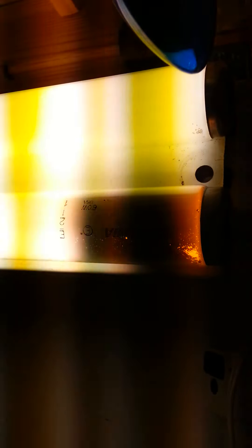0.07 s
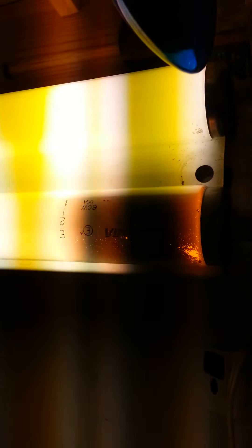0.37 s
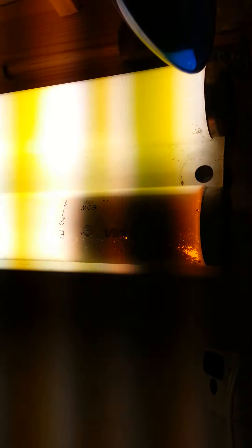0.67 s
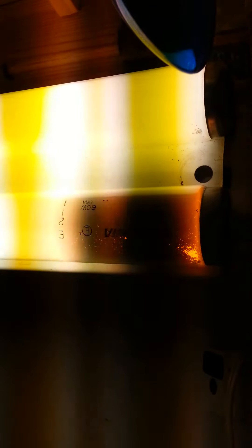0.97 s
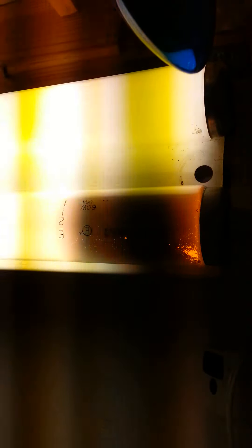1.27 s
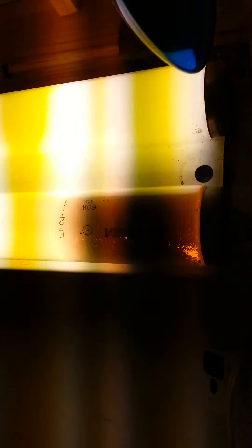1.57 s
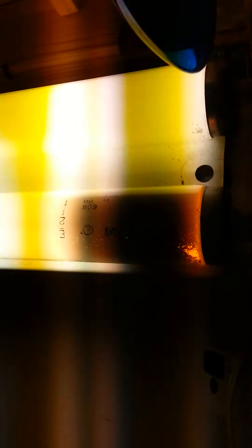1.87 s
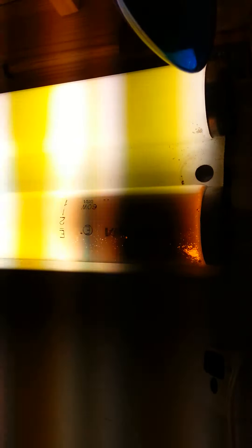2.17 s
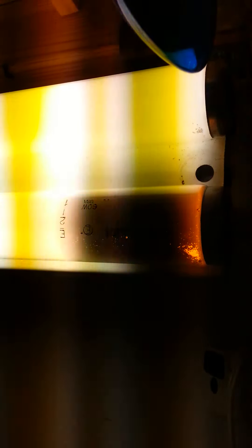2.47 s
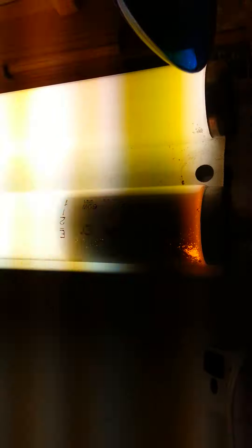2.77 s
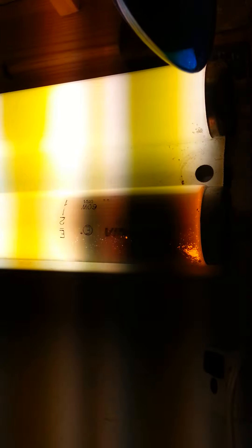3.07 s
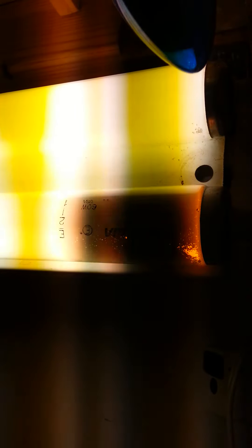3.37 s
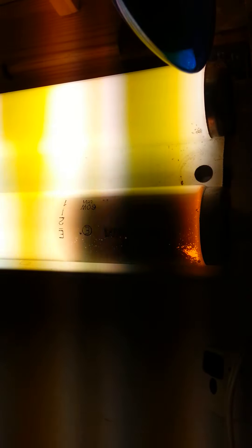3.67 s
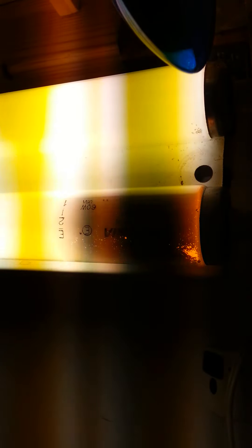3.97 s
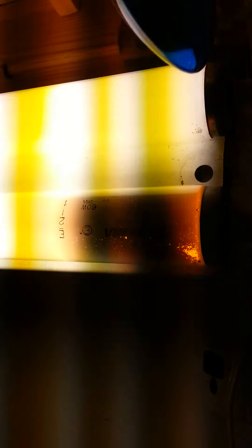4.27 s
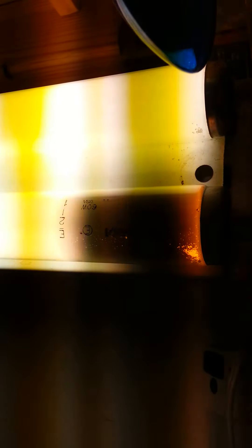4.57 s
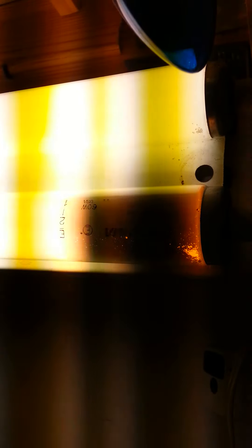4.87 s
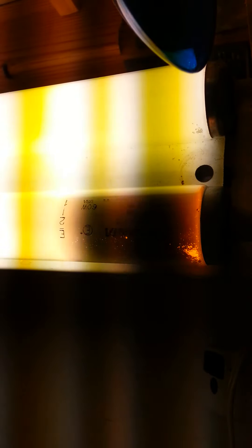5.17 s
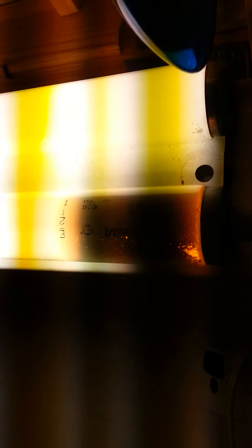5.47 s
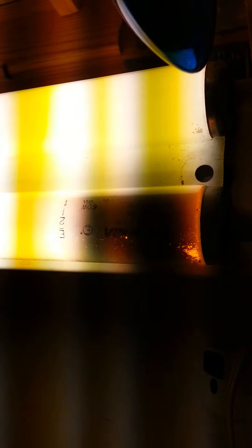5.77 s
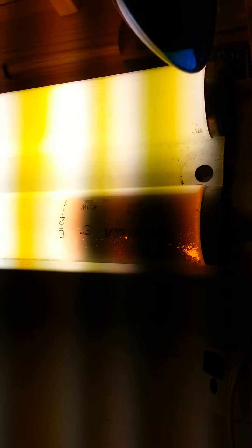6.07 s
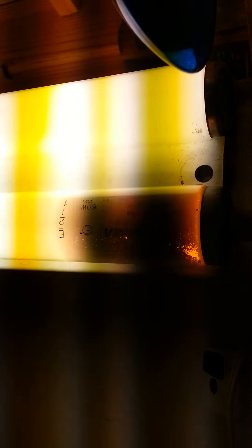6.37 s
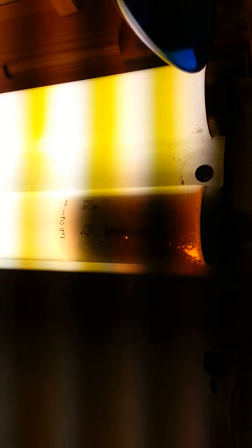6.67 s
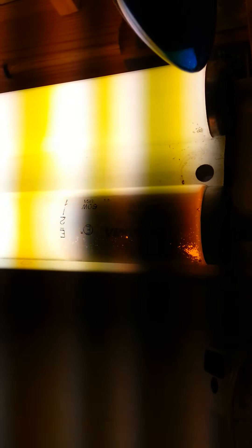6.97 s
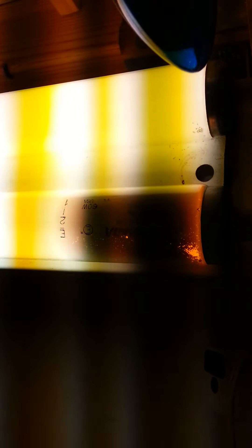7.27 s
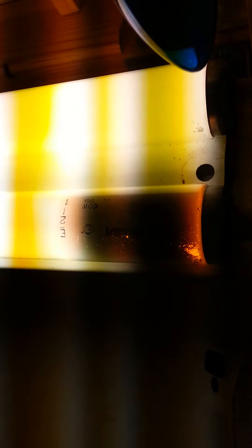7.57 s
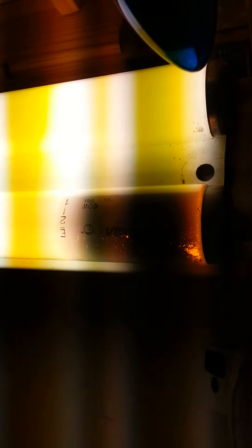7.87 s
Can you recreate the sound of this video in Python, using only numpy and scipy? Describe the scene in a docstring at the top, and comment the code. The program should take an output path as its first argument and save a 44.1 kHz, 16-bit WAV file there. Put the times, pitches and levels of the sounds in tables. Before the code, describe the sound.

Close electrical buzz from a flickering fluorescent light, sputtering and crackling over a low hum before settling somewhat.

```python
"""A failing fluorescent tube in a small room, with a stereo microphone very close to the fixture.
Its ballast knocks twice in each mains cycle: an even hum while the arc holds, a stumbling rattle while
it flickers. The worn electrode fizzes, crackles in bursts and now and then snaps against the glass;
after about five seconds the arc calms down. A fine sizzle and a thin whistle sit to the right,
and behind it all lies the room tone, a faint hiss and a low drone."""
import sys
import numpy as np
from scipy import signal
from scipy.fft import rfft, irfft, next_fast_len
from scipy.io import wavfile

SR = 44100
rng = np.random.default_rng(int(sys.argv[2]) if len(sys.argv) > 2 else 0)


def file_out(sig):
    """Save sig as 16-bit WAV at sys.argv[1]."""
    # one column per channel
    cols = np.atleast_2d(sig).T
    # limit, then scale
    lim = np.clip(cols, -1, 1)
    pcm = np.round(lim * 32767).astype(np.int16)
    wavfile.write(sys.argv[1], SR, pcm)


N = 353241
TIME = np.arange(N) / SR
SIZE = next_fast_len(N + SR)
FREQ = np.maximum(np.arange(SIZE // 2 + 1) * SR / SIZE, 1)
MAINS_HZ = 60.01

# spectrum of the background hiss: (frequency [Hz], relative level [dB])
HISS_SPECTRUM = [(20, 2), (40, 6), (56, 17), (70, 16), (100, 21), (300, 27.5), (700, 18), (1500, 5),
                 (3300, 0), (4100, -3), (4750, 9), (5600, -5.5), (9000, -2.5), (14500, -5.5)]
# swells of the arc's whistle at the right microphone: (peak time [s], length [s], level [dB])
WHISTLE_SWELLS = [(.15, 1.1, -66), (1.004, 0.3, -59), (6.1, 1.3, -72)]
# the arc's sizzle at the right microphone: (time [s], level [dB])
SIZZLE_LEVELS = [(0, -61), (1.45, -61), (1.55, -69), (1.8, -61), (4.35, -58), (4.5, -63), (5.5, -71),
                 (5.65, -69), (6.7, -67), (6.9, -80), (7.5, -72), (7.8, -61), (8, -54)]
# highest modes of the tube: (frequency [Hz], width [Hz], relative level [dB])
TUBE_MODES = [(7075, 35, 1), (8340, 200, 0), (9070, 120, -3), (9890, 90, 2), (10080, 50, -1),
              (11600, 200, -8), (12300, 500, -5), (14000, 700, -10)]

# spectrum of the fizz: (frequency [Hz], relative level [dB])
FIZZ_SPECTRUM = [(300, -20), (700, -4), (1100, 0), (1450, -1), (2300, 0), (3300, -2), (4500, -1),
                 (6000, -3), (8000, -8), (10500, -13), (12800, -10.5), (14500, -16)]
# spectrum of the crackle: (frequency [Hz], relative level [dB])
CRACKLE_SPECTRUM = [(1000, -7), (3500, -7.5), (5000, -0.5), (6800, -0.5), (8500, -4), (9600, -9),
                    (12500, -20.5), (14500, -36)]
# modes of the end cap: (frequency [Hz], width [Hz], level against the fizz spectrum [dB])
CAP_MODES = [(1882, 46, 10.5), (1968, 30, 8), (2014, 34, 6.5), (4440, 100, -5)]
# modes of the glass: (frequency [Hz], width [Hz], level against the crackle spectrum [dB])
GLASS_MODES = [(5830, 50, -2), (6120, 28, -3), (6240, 36, 3), (6470, 70, 0), (6812, 55, 5), (6880, 45, 2),
               (6970, 60, 2), (7210, 25, 1), (7420, 60, -2), (7960, 32, -4), (8375, 45, 7), (8620, 60, -4),
               (9890, 66, -3), (12300, 200, -5)]
# the electrode's treble across the microphone pair: (frequency [Hz], left minus right [dB])
TREBLE_BALANCE = [(1000, 10), (3000, -6.5), (4800, 4), (6200, 0.5), (7200, -11.5), (8500, -13.5),
                  (12000, -16.5), (14500, 5)]
# steady frying of the electrode: (time [s], level [dB])
FRYING_LEVELS = [(0, -53.5), (.6, -50), (1.08, -52), (1.42, -51.5), (1.54, -68), (1.66, -65), (1.8, -53),
                 (2.05, -49), (2.1, -56), (2.2, -52), (2.55, -52), (2.66, -68), (2.72, -64), (2.92, -51),
                 (3, -63), (3.15, -52), (4.38, -47.5), (4.47, -61), (5.1, -63.5), (6.65, -63), (6.9, -70),
                 (7.72, -67.5), (7.77, -54), (8, -55.5)]
# short swells of discharges: (peak time [s], length [s], fizz level [dB], crackle level [dB])
SPUTTERS = [(0.126, 0.035, -48, -47), (0.267, 0.054, -43, -47), (0.388, 0.071, -46, -47),
            (0.512, 0.022, -48, -48), (1.187, 0.069, -46.5, -48), (1.292, 0.046, -44.5, -60),
            (1.342, 0.036, -54, -50), (1.477, 0.043, -42, -46), (1.598, 0.03, -50, -52),
            (1.706, 0.027, -54, -49.5), (1.85, 0.1, -51.5, -52), (1.992, 0.044, -38, -41),
            (2.137, 0.024, -51, -51), (2.259, 0.07, -44.5, -43), (2.376, 0.097, -43.5, -43.5),
            (2.572, 0.074, -45, -46), (2.784, 0.064, -44, -50), (2.862, 0.039, -43.5, -45),
            (2.919, 0.052, -46, -47), (3.02, 0.013, -73, -52), (3.125, 0.053, -39.5, -40.5),
            (3.494, 0.047, -44, -49.5), (4.37, 0.064, -53, -47.5), (4.61, 0.069, -43.5, -46.5),
            (4.898, 0.055, -48.5, -53), (5.331, 0.029, -55, -70), (5.55, .03, -57, -70),
            (5.93, 0.037, -60, -55), (6.36, 0.044, -60, -57), (6.484, 0.017, -59, -55.5),
            (6.804, 0.035, -61, -50), (7.587, 0.036, -58, -54), (7.756, 0.015, -65, -58),
            (7.99, 0.03, -55, -50.5)]
# snaps as they hit the glass: (time [s], drive level [dB], tick drive against the snap's [dB])
GLASS_SNAPS = [(.1012, -37, -11), (.1276, -41, -11), (.2608, -31, -11), (.3785, -37, -11),
               (.411, -25.5, -11), (1.1223, -38, -11), (1.1842, -32, -11), (1.2775, -34, -17),
               (1.2945, -21, -7), (1.4606, -34, -16), (1.478, -24, -6), (1.6846, -40, -6),
               (1.8442, -30, -9), (1.926, -38, -11), (1.9674, -29, -11), (1.9944, -25, -11),
               (2.2438, -32, -13), (2.2772, -32, -13), (2.2938, -20, -4), (2.3775, -33, -13),
               (2.394, -33, -11), (2.4269, -33, -15), (2.8599, -28, -11), (2.9103, -36, -11),
               (3.0225, -41, -5), (3.093, -34, -11), (3.1273, -26.5, -11), (4.577, -31, -15),
               (4.5935, -23, -8), (4.6104, -20.5, -8), (6.7805, -41, -7), (7.5966, -43, -8),
               (7.7353, -43, -8), (7.7538, -39, -9), (7.8495, -43, -9), (7.872, -41, -9), (7.9703, -44, -9)]
# small dull pops and knocks: (time [s], drive level [dB])
DULL_POPS = [(2.695, -44), (3.043, -46), (7.16, -46), (7.795, -44)]

# the ballast's two knocks: (time into the mains cycle [s], strength [ratio])
CYCLE_KNOCKS = [(.0025, .9), (.0133, 1)]
# spectrum of one knock: (frequency [Hz], relative level [dB])
KNOCK_SPECTRUM = [(30, -24), (80, -25), (100, -1.5), (230, 3.5), (350, -2), (520, 2.5), (600, 2),
                  (660, -10.5), (1250, -4), (1500, -11.5), (4000, -64)]
# mains harmonics from the first upwards: (relative level left [dB], relative level right [dB])
HUM_HARMONICS = [(-35, -32), (-13, -8), (-2, -1.5), (-13, -2), (-7.5, -3), (-9, -1.5), (-8, -9), (-7.5, -4),
                 (-13, -9.5), (-11, -8.5), (-21, -21), (-16, -18), (-18, -20), (-24, -28), (-15, -17),
                 (-23, -25), (-26, -26), (-26, -23), (-26, -21), (-26, -25), (-25, -23), (-32, -32)]
# broad resonances of the fixture: (frequency left [Hz], frequency right [Hz], width [Hz])
FIXTURE_MODES = [(226, 153, 350), (435, 385, 120)]
# modes of the housing: (frequency [Hz], width [Hz], relative level left [dB], relative level right [dB])
HOUSING_MODES = [(88, 14, -21, -15), (104, 12, -15, -9), (133, 17, -18, -15), (170, 6, -13, -7),
                 (208, 20, -14, -14), (229, 20, -7, 0), (279, 20, -10, -12), (309, 12, -10, -8),
                 (349, 13, -3, -4), (373, 10, -14, -17), (411, 20, -13, -12), (469, 20, -17, -8),
                 (488, 20, -13, -20), (523, 11, -3, -2.5), (586, 20, -9, -7), (698, 21, -14, -17),
                 (754, 77, -22, -26), (882, 40, -10, -11), (951, 40, -14, -14), (1076, 40, -18, -10),
                 (1150, 45, -19, -14), (1228, 20, -25, -26)]
# how the arc sits on the electrode:
# (time [s], strike delay [ms], gain above harmonic 10 [dB], gain of harmonics 4, 6 and 8 [dB])
ARC_SEAT = [(0, 0.0039, -6, .5), (4.3, -0.16, -5.5, 0.5), (4.9, 0.37, -4.5, -1.5), (6.72, -0.17, -5, 0),
            (6.8, 0.5, -1, 4), (6.92, 0.15, -3.5, -5.5), (7.52, -0.67, -6, 0.5), (7.61, -.37, -7, -4.5),
            (7.73, -0.56, 0, 2.5), (8.01, -0.31, 0, 1.5)]
# current through the ballast: (time [s], level [dB], unrest [0-1])
BALLAST_CURRENT = [(0, -39.7, 0.72), (.36, -41.5, 0.71), (.58, -40, 0.44), (.78, -40.5, 0.7),
                   (.95, -40, .48), (1.18, -45.5, 0.73), (1.6, -43, 0.67), (2.1, -40.5, 0.79),
                   (2.45, -39, 0.6), (2.92, -43.5, 0.73), (3.22, -39.5, 0.59), (4.1, -39, 0.59),
                   (4.42, -41.5, 0.76), (4.7, -42, 0.62), (5.2, -42, .54), (6.1, -41.5, 0.49),
                   (6.3, -45, 0.63), (6.55, -41, 0.52), (6.72, -44.5, 0.72), (6.92, -43.5, 0.3),
                   (7.11, -42.5, 0.2), (7.15, -43.5, .6), (7.24, -42.7, 0.2), (7.46, -42, .26),
                   (7.6, -42.2, 0.57), (7.75, -41, 0.49)]
# the arc catches and the ballast rattles harder: (peak time [s], length [s], rise [dB])
SURGES = [(0.091, 0.02, 1), (0.223, 0.031, 1), (0.303, 0.023, 5), (0.374, 0.039, 4), (0.447, 0.023, 2),
          (0.544, 0.026, 1), (0.81, 0.029, 1), (1, 0.022, 2.5), (1.103, 0.065, 5.0), (1.165, 0.042, 7),
          (1.239, 0.062, 6.5), (1.342, 0.025, 6.5), (1.424, 0.066, 6), (1.572, 0.022, 4.5),
          (1.68, 0.019, 3.5), (1.803, 0.034, 5.5), (1.88, 0.019, 3), (1.951, 0.044, 6), (2.02, 0.034, 3),
          (2.21, 0.099, 1.5), (2.337, 0.041, 5.0), (2.507, 0.029, 4), (2.6, 0.022, 4.5), (2.748, 0.041, 4),
          (2.845, 0.029, 7.5), (2.882, 0.048, 4), (3.08, 0.07, 5.5), (3.448, 0.019, 3.5), (4.212, 0.044, 4),
          (4.31, 0.048, 3), (4.392, 0.029, 6.0), (4.482, 0.028, 2.5), (4.559, 0.051, 4.5),
          (4.643, 0.033, 4.5), (6.315, 0.05, 5.5), (6.417, 0.077, 1)]
# the current sinks until the arc strikes again: (strike time [s], length [s], depth [dB])
DROPOUTS = [(0.056, 0.018, 8), (2.098, 0.07, 5), (2.169, 0.02, 6.5), (2.687, 0.055, 6), (3.039, 0.021, 11),
            (4.371, 0.024, 2.5), (4.52, 0.035, 7.5), (6.378, 0.037, 7), (6.59, 0.075, 8), (6.724, 0.013, 0),
            (7.547, 0.022, 4)]


def undb(db):
    """Decibels to gain."""
    return 10 ** (np.asarray(db) / 20)


def unit(x):
    """Scale to rms 1."""
    return x / np.sqrt(np.mean(x ** 2))


def curves(table):
    """Each column of a timed table, sample by sample."""
    times, *columns = np.transpose(table)
    return [np.interp(TIME, times, column) for column in columns]


def swell(centre_s, length_s):
    """A rounded rise and fall, length_s wide at half height."""
    distance = np.minimum(np.abs(2 * (TIME - centre_s) / length_s), 10)
    return np.exp(-np.log(2) * distance ** 2)


def colour(points):
    """Gain at every frequency from (Hz, dB) points."""
    hz, db = np.transpose(points)
    return undb(np.interp(np.log(FREQ), np.log(hz), db))


def resonances(modes):
    """Summed response of damped modes."""
    return sum(undb(db) / (1 + 1j * (FREQ / hz - hz / FREQ) * hz / width) for hz, width, db in modes)


def filtered(x, response):
    """Pass a sound through a frequency response."""
    return irfft(rfft(x, SIZE) * response)[..., :N]


def wobble(hz, width_hz):
    """A random swing near one rate, rms 1."""
    return unit(filtered(rng.standard_normal(SIZE), resonances([(hz, width_hz, 0)]) ** 2))


def impulses(times, sizes):
    """One click of the given size at each time."""
    return np.bincount(np.clip(times * SR, 0, N).astype(int), sizes, N + 1)[:N]


def smear(energy, decay_s):
    """Let energy die away exponentially, keeping its sum."""
    keep = np.exp(-1 / (decay_s * SR))
    return signal.lfilter([1 - keep], [1, -keep], energy)


def mic_delay(lag_ms):
    """The sound reaches the left microphone a little later than the right."""
    return np.exp(-2j * np.pi * FREQ * np.array([[lag_ms / 1000], [0]]))


def echoes(t60_s, db):
    """Response of dense reflections dying away, different at each microphone."""
    tail = rng.standard_normal((2, SR)) * np.exp(-np.log(1000) * TIME[:SR] / t60_s)
    return undb(db) * rfft(tail / np.sqrt(np.sum(tail ** 2) / 2), SIZE)


def room_hiss(db=-51, shared=.38):
    """Room tone: a faint steady hiss, partly alike at both microphones."""
    noise = rng.standard_normal((2, N)) + shared * rng.standard_normal(N)
    return undb(db) * unit(filtered(noise, colour(HISS_SPECTRUM)))


def room_drone(hz=132.0, db=-63):
    """A faint, steady low tone in the room that beats against the hum."""
    return undb(db) * np.sin(2 * np.pi * hz * TIME)


def arc_whistle(hz=7090, width_hz=70, left_db=-7):
    """The arc sings a faint, unsteady high note, right of centre."""
    envelope = sum(undb(db) * swell(s, length) for s, length, db in WHISTLE_SWELLS)
    return wobble(hz, width_hz) * envelope * undb([[left_db], [0]])


def sparks(per_s, spread_db, bunching, decay_s, peak_s=.0065):
    """Energy of tiny discharges of random size, strongest at peak_s into each mains cycle."""
    when, size = rng.uniform(0, 1, (int(per_s * N / SR), 2)).T
    energy = impulses(when * N / SR, undb(spread_db * size ** 2) ** 2)
    phase = 2 * np.pi * MAINS_HZ * (TIME - peak_s)
    return smear(energy * np.exp(bunching * (np.cos(phase) + np.cos(2 * phase))), decay_s)


def bursts(events, decay_s):
    """Energy of short, decaying bursts, one for each (s, dB) event."""
    times, db = np.transpose(events)
    return smear(impulses(times, undb(db) ** 2), decay_s) * decay_s * SR


def shaped_noise(energy, room_db, room_s=.013, shared=.41):
    """Noise that follows an energy curve, with the room's tail, partly alike at both microphones."""
    noise = rng.standard_normal((2, N)) + shared * filtered(rng.standard_normal(N), mic_delay(.256))
    return unit(noise) * np.sqrt(energy + undb(room_db) ** 2 * smear(energy, room_s))


def arc_sizzle(waver_db=4.5, left_db=-7):
    """Dense, tiny ticks ring the highest modes of the tube, right of centre."""
    ticks = sparks(per_s=1400, spread_db=16, bunching=.6, decay_s=.0006)
    sound = unit(filtered(shaped_noise(ticks, room_db=-9), resonances(TUBE_MODES)))
    level_db = curves(SIZZLE_LEVELS)[0] + waver_db * wobble(13, 8.6)
    return sound * undb(level_db) * undb([[left_db], [0]])


def frying_gains(waver_db=1.0, crackle_offset_db=-4.5, spit_db=2):
    """Strength of fizz and crackle: wavering frying, the crackle in little spits, sputters on top."""
    frying_db = curves(FRYING_LEVELS)[0] + waver_db * wobble(10.2, 12.0)
    fizz_power = undb(frying_db) ** 2
    crackle_power = undb(frying_db + crackle_offset_db + spit_db * wobble(5.6, 21)) ** 2
    for s, length, fizz_db, crackle_db in SPUTTERS:
        sputter = swell(s, length)
        fizz_power += sputter * undb(fizz_db) ** 2
        crackle_power += sputter * undb(crackle_db) ** 2
    return np.sqrt(fizz_power), np.sqrt(crackle_power)


def dull_pops(response):
    """Small dull pops and knocks, two of them as the arc strikes again."""
    pops = shaped_noise(bursts(DULL_POPS, decay_s=.005), room_db=-6)
    return filtered(pops, response * colour([(2500, 0), (6000, -10)]))


def glass_snaps(glass):
    """A dense volley of discharges snaps with a bright tick, then the glass rings on."""
    ticks = bursts([(s, db + tick_db) for s, db, tick_db in GLASS_SNAPS], decay_s=.0015)
    brightness = undb(4) * colour([(4000, -14), (7000, -7), (10000, 0), (12000, 6), (14500, 19)])
    tick = filtered(shaped_noise(ticks, room_db=-12), glass * brightness)
    rings = bursts([(s, db) for s, db, _ in GLASS_SNAPS], decay_s=.0043)
    ring = filtered(shaped_noise(rings, room_db=-10), glass * colour([(4000, -5), (6500, -1)]))
    return tick + ring


def electrode():
    """Close up, fizz rings the end cap, crackle and snaps the glass; a few dull pops fall between."""
    fizz_gain, crackle_gain = frying_gains()
    balance = np.sqrt(colour(TREBLE_BALANCE)) ** np.array([[1], [-1]])
    # reflections inside the fixture ripple the spectrum
    path_to_mics = balance * (1 + echoes(t60_s=.04, db=-12))
    fizz_response = colour(FIZZ_SPECTRUM) * (1 + resonances(CAP_MODES)) * path_to_mics
    glass = colour(CRACKLE_SPECTRUM) * (1 + resonances(GLASS_MODES)) * path_to_mics
    fine = sparks(per_s=1500, spread_db=18, bunching=.75, decay_s=.0008)
    coarse = sparks(per_s=700, spread_db=18, bunching=.6, decay_s=.0013)
    fizz = unit(filtered(shaped_noise(fine, room_db=17), fizz_response)) * fizz_gain
    crackle = unit(filtered(shaped_noise(coarse, room_db=-7), glass)) * crackle_gain
    return fizz + crackle + glass_snaps(glass) + dull_pops(fizz_response)


def dropout_db(strike_s=.002):
    """Loss of level as the current sinks: it deepens smoothly and ends at once with the strike."""
    return sum(db * swell(s, 2 * length) * (1 - np.tanh((TIME - s) / strike_s)) / 2
               for s, length, db in DROPOUTS)


def ballast_rattle(roughness, jitter_s=.00053, size_spread=.39, bright_roughness=.35):
    """Knocks ring the housing; they sway with the arc's flutter, or turn erratic when it is rough."""
    cycles = np.arange(0, N / SR, 1 / MAINS_HZ)
    erratic = np.interp(cycles, TIME, roughness) ** 2
    flutter = np.interp(cycles, TIME, wobble(hz=14.8, width_hz=4))
    knocks = 0
    for s, size in CYCLE_KNOCKS:
        timing, direction, force = rng.uniform(-1, 1, (len(cycles), 3)).T
        kick = np.sign(direction) * (1 + size_spread * force)
        strength = size * (np.sqrt(erratic) * kick + np.sqrt(1 - erratic) * np.tanh(2 * flutter))
        knocks += impulses(cycles + s + jitter_s * erratic * timing, strength)
    housing = np.array([resonances([(hz, width, db[side]) for hz, width, *db in HOUSING_MODES])
                        for side in range(2)])
    room = echoes(t60_s=.14, db=-8) * colour([(550, -3), (800, 0)])
    bright = filtered(knocks, housing * colour(KNOCK_SPECTRUM) * (mic_delay(.22) + room))
    # the knocks of a calm arc are duller
    dull = filtered(bright, colour([(600, 0), (700, -7)]))
    hardness = np.minimum(roughness / bright_roughness, 1) ** 2
    return unit(dull + hardness * (bright - dull))


def ballast_hum(left_lag_s=.00011, phase_shift_rad=.7):
    """The even hum: mains harmonics that line up on the two knocks of each cycle."""
    strike_ms, edge_db, even_db = curves(ARC_SEAT)
    time = TIME - strike_ms / 1000 - np.array([[left_lag_s], [0]])
    modes = [(np.array([[left], [right]]), width) for left, right, width in FIXTURE_MODES]
    hum = 0
    for k, db in enumerate(HUM_HARMONICS, 1):
        hz = k * MAINS_HZ
        knock_pair = sum(size * np.exp(-2j * np.pi * hz * s) for s, size in CYCLE_KNOCKS)
        # the fixture draws each knock out into a short wobble
        lag = sum(np.arctan((hz / mode_hz - mode_hz / hz) * mode_hz / width) for mode_hz, width in modes)
        # one phase shift on all harmonics makes the pulses less lopsided
        phase = np.angle(knock_pair) - lag + phase_shift_rad
        seat_db = edge_db if k > 10 else even_db if k in (4, 6, 8) else 0
        hum -= undb(seat_db) * undb(db)[:, None] * np.cos(2 * np.pi * hz * time + phase)
    return unit(hum)


def ballast(flicker_db=.04, unrest_per_db=.013):
    """Unrest turns hum into rattle; surges make it louder and rougher, dropouts choke it."""
    level_db, unrest = curves(BALLAST_CURRENT)
    surge_db = sum(db * swell(s, length) for s, length, db in SURGES)
    roughness = np.clip(unrest + unrest_per_db * surge_db, 0, .97) ** 1.6
    sound = np.sqrt(1 - roughness ** 2) * ballast_hum() + roughness * ballast_rattle(roughness)
    return sound * undb(level_db + surge_db - dropout_db() + flicker_db * roughness * wobble(19, 13))


def scene():
    """Ballast, electrode and arc right at the microphones, the quiet room behind."""
    return ballast() + electrode() + arc_sizzle() + arc_whistle() + room_drone() + room_hiss()


def record(dry):
    """The recorder cuts the top of the treble."""
    lowpass = signal.ellip(10, .2, 80, 14550, fs=SR, output="sos")
    return signal.sosfilt(lowpass, dry)


dry = scene()
out = record(dry)
file_out(out)
```